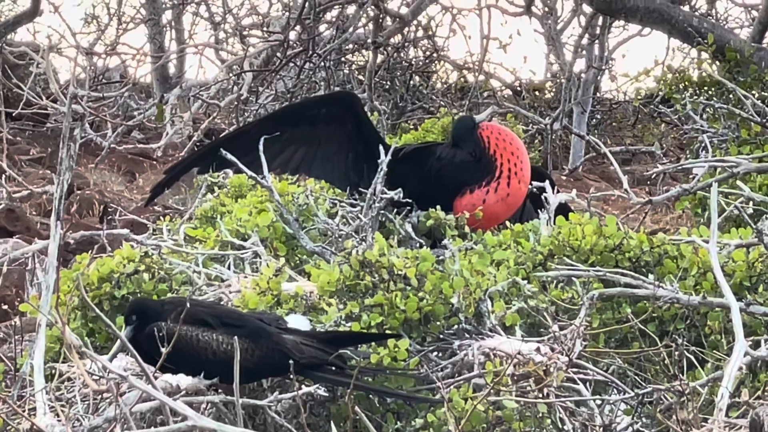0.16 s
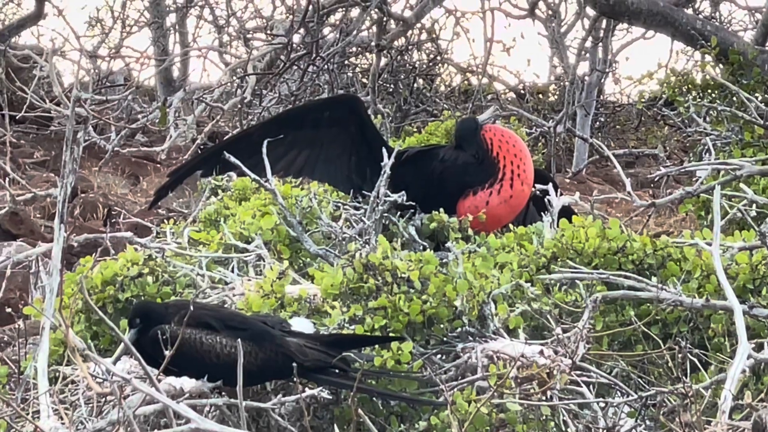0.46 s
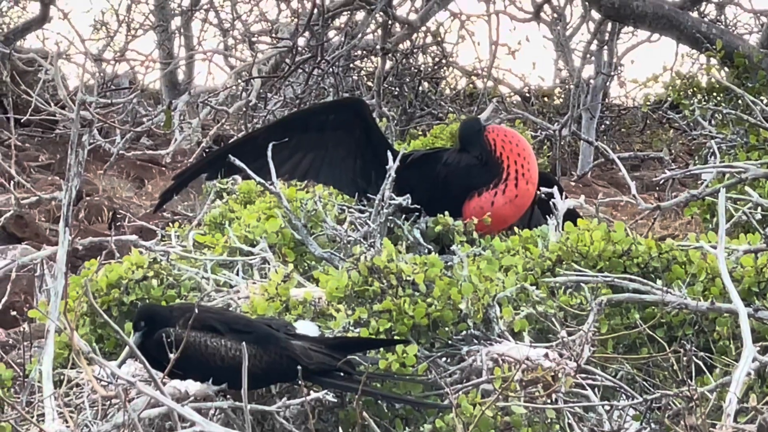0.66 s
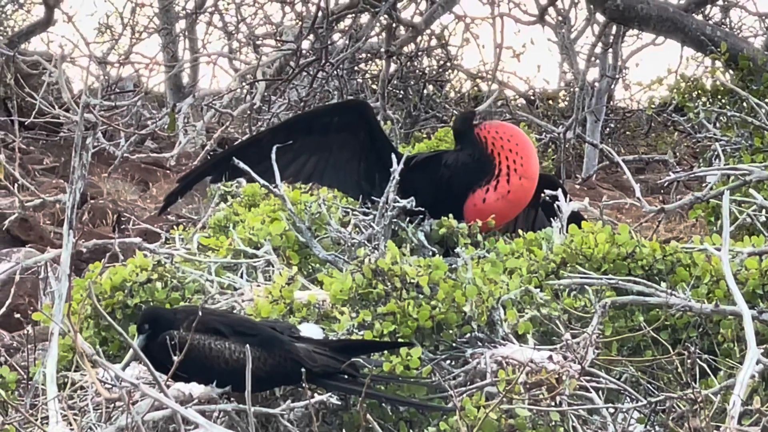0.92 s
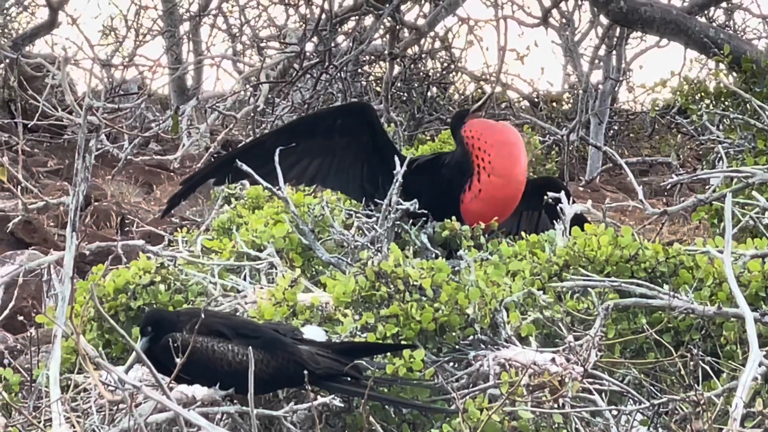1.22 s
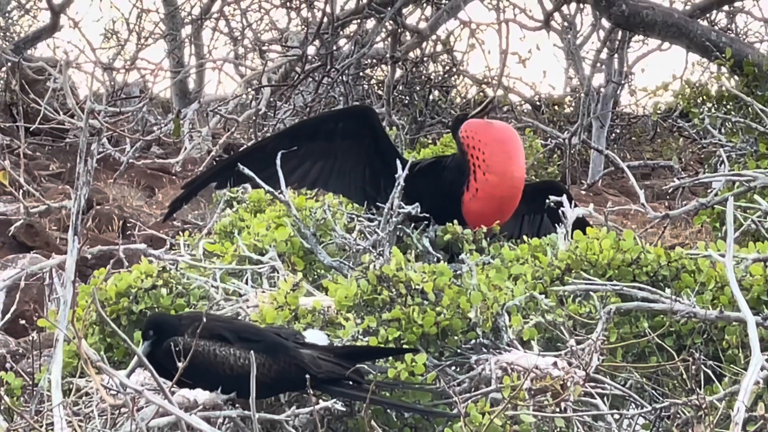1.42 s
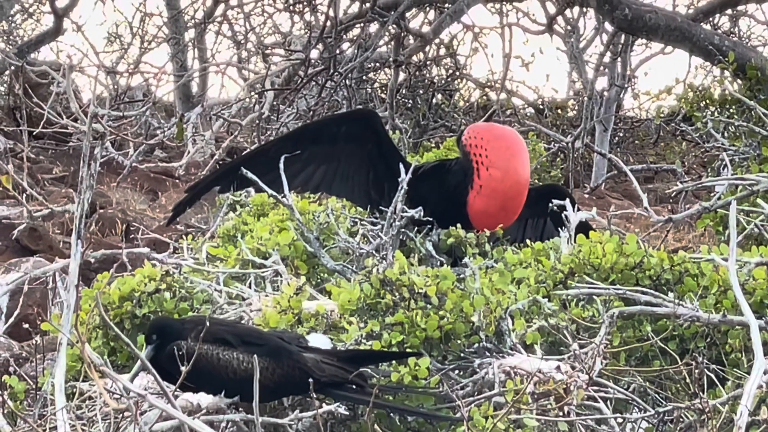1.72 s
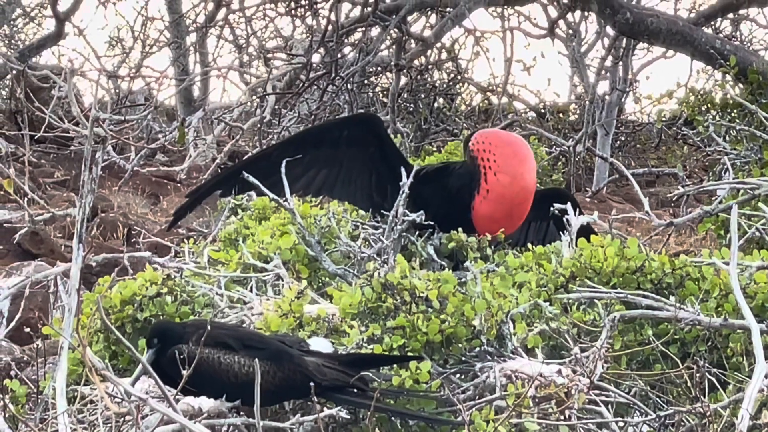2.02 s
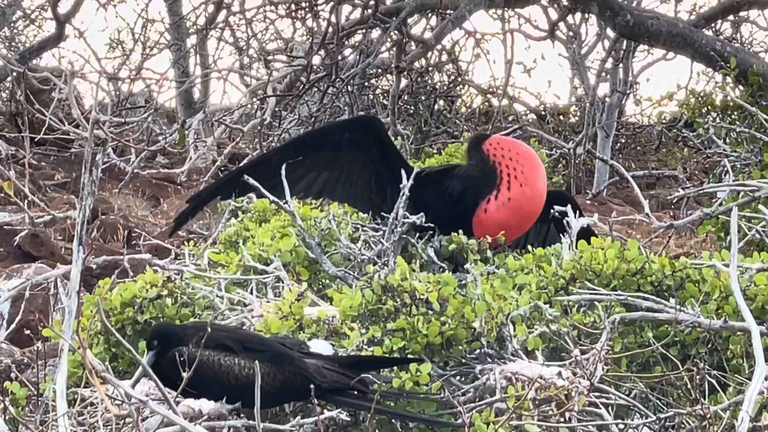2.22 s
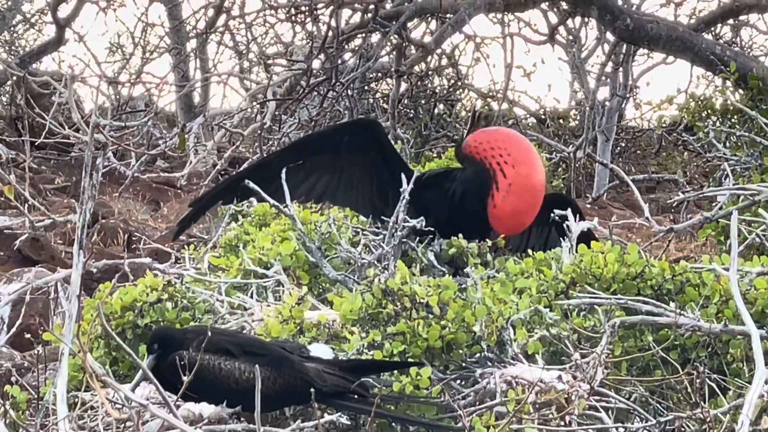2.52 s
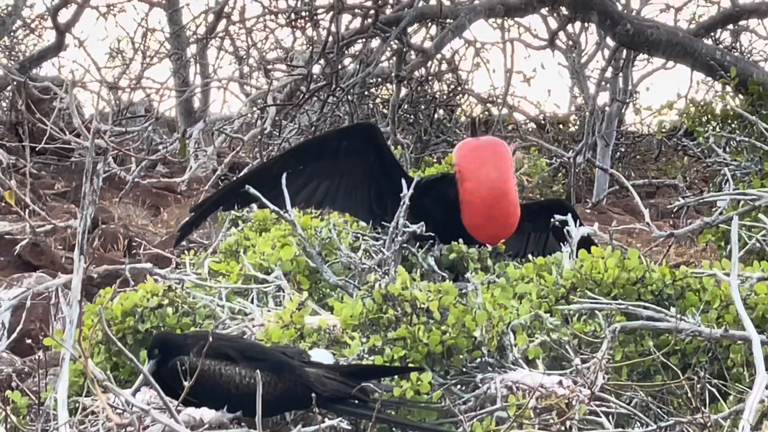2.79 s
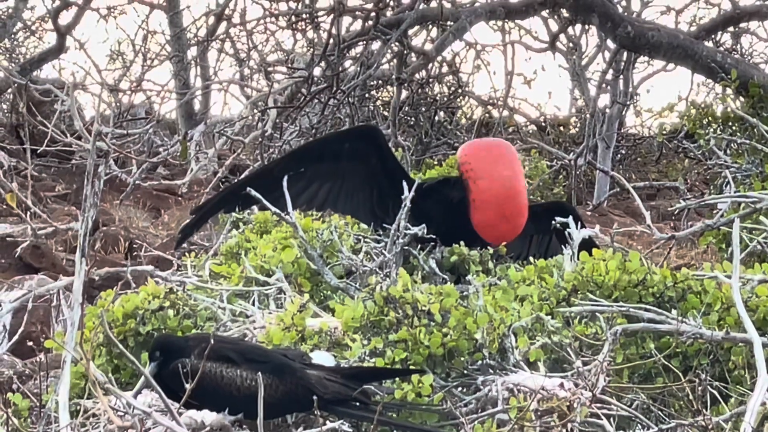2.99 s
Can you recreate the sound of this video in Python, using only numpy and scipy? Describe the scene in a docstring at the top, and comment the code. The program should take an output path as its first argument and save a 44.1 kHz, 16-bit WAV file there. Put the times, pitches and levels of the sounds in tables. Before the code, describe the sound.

A large seabird calls among dry shrubs. Small twig ticks and leaf crackle open over soft wind and a low engine-like drone. A thin, rapidly warbling whistle runs 0.55-1.4 s, then trails faintly. A soft hollow pouch knock falls at 1.6. From 2.0 to 2.8, eight sharp bill snaps rattle slowly; a second warble spans 2.6-3.15, with a last snap at 3.08 and a loud hollow knock at 3.12.

```python
"""Bill rattle and warbling whistles among shrubs

A large seabird among dry shrubs snaps its bill in a slow rattle: short bursts of damped partials.
Its inflated pouch, a set of decaying modes, is knocked once loudly and once faintly.
Whistles, loud and faint, are frequency-modulated tones; twigs and dry leaves give tiny noise bursts.
Swells of leaf hiss, a low drone and wind are noise bands of wavering level.
"""
import sys
import numpy as np
from scipy import signal
from scipy.fft import rfft, irfft
from scipy.io import wavfile

SR = 44100
rng = np.random.default_rng(int(sys.argv[2]) if len(sys.argv) > 2 else 0)


def file_out(sig):
    """Save sig as 16-bit WAV at sys.argv[1]."""
    # one column per channel
    cols = np.atleast_2d(sig).T
    # limit, then scale
    lim = np.clip(cols, -1, 1)
    pcm = np.round(lim * 32767).astype(np.int16)
    wavfile.write(sys.argv[1], SR, pcm)


N = 138915  # samples
ECHO_T60_S = 0.26  # usual decay of the longer echo tail

SNAP_RISE_S, SNAP_HOLD_S, SNAP_T60_S = 0.00129, 0.00133, 0.0018


def burst(t):
    """Pulse envelope: a sine-squared rise, a brief hold and an exponential decay."""
    rise = np.sin(np.pi / 2 * np.clip(t / SNAP_RISE_S, 0, 1)) ** 2
    return rise * fall(np.maximum(t - SNAP_RISE_S - SNAP_HOLD_S, 0), SNAP_T60_S)


# Bill snaps: t/s, level/dB, fundamental f/Hz, fundamental level/dB re the snap, main ring f/Hz
BILL_SNAPS = [(2.0209, -38, 2370, -9, 4790), (2.143, -46.5, 2490, 0, 4650), (2.2542, -51, 2420, 0.5, 4560),
              (2.3481, -44.5, 2510, -6.5, 4740), (2.463, -38, 2520, -10, 4780),
              (2.5701, -36.5, 2390, -13, 4790), (2.6835, -35.5, 2490, -10, 4855),
              (2.816, -32.5, 2460, -14.5, 4815), (3.0821, -39.5, 2380, -6.5, 4630)]
# Partials of the bill: frequency ratio to the main ring, level/dB
BILL_PARTIALS = [(1, -1), (1.14, -13), (1.46, -17), (1.35, -26), (1.62, -21.5), (.85, -25), (1.93, -30),
                 (2.55, -33)]
PITCH_SAG, SAG_TIME_S = 0.025, 0.0032  # share by which pitch sinks, and the time that takes
FUNDAMENTAL_DELAY_S = 0.00096
VARY_DB, VARY_PITCH = 8.5, 0.037  # full range of the side partials: dB, share of frequency
CRACK_DB, CRACK_RISE_S, CRACK_T60_S = -10, 0.00059, 0.009
CRACK_BAND_HZ = [2000, 6760]
SNAP_ECHO_DB = -11.5


def snaps():
    """Impact excitation: each snap is a noise crack and a short burst of the bill's partials."""
    out, t = np.zeros((2, N)), np.arange(600) / SR
    turns = rng.random((len(BILL_SNAPS), len(BILL_PARTIALS), 3))
    crack_filter = signal.butter(2, CRACK_BAND_HZ, "band", fs=SR, output="sos")
    cracks = signal.sosfilt(crack_filter, rng.standard_normal((len(BILL_SNAPS), 600)))
    phase = 2 * np.pi * (t - PITCH_SAG * t ** 2 / (2 * SAG_TIME_S))
    for (s, db, hz, low_db, ring_hz), turn, crack in zip(BILL_SNAPS, turns, cracks):
        fundamental = undb(low_db) * burst(t - FUNDAMENTAL_DELAY_S) * np.sin(hz * phase)
        ring = 0
        for (ratio, partial_db), (start, level_draw, pitch_draw) in zip(BILL_PARTIALS, turn):
            varies = ratio != 1  # the main ring stays fixed
            gain = undb(partial_db + VARY_DB * (level_draw - .5) * varies)
            partial_hz = ring_hz * ratio * (1 + VARY_PITCH * (pitch_draw - .5) * varies)
            ring = ring + gain * np.sin(partial_hz * phase + 2 * np.pi * start)
        crack_env = np.clip(t / CRACK_RISE_S, 0, 1) * fall(t, CRACK_T60_S)
        x = fundamental + burst(t) * ring + undb(CRACK_DB) * crack * crack_env
        add(out, undb(db) * x, s - .0005, 0)
    return echo(ports(out), SNAP_ECHO_DB)


# Knocks on the pouch: t/s, peak level/dB before echo
POUCH_KNOCKS = [(3.1194, -29), (1.599, -49.5)]
# Modes of the hollow pouch: f/Hz at the blow, level/dB, T60/s
POUCH_MODES = [(244, -12.5, 0.052), (374, -5.5, 0.13), (500, -0.5, 0.026), (750, 1, 0.063),
               (1044, -6.5, 0.048), (1172, -1, 0.091), (1385, -7, 0.041), (1538, -13, 0.063),
               (2250, -15.5, 0.082), (2510, -13, 0.029), (3570, 3, 0.0045), (6700, -8, 0.0063),
               (12800, -10, .004)]
POUCH_RISE, POUCH_RISE_S = 0.028, 0.013  # share by which pitch climbs after the blow, time constant
KNOCK_ECHO_DB = -13


def knocks():
    """Modal synthesis: a blow rings the hollow pouch as decaying sines of climbing pitch."""
    out, t = np.zeros((2, N)), np.arange(8000) / SR
    tense = t + POUCH_RISE * (t - POUCH_RISE_S * (1 - np.exp(-t / POUCH_RISE_S)))
    ring = 0
    for k, (hz, db, t60) in enumerate(POUCH_MODES):
        mode = undb(db) * fall(t, t60) * np.sin(2 * np.pi * hz * tense)
        ring = ring + (-1) ** k * mode  # alternating polarity
    for s, db in POUCH_KNOCKS:
        add(out, undb(db) * ring / abs(ring).max(), s, 0)
    return echo(out, KNOCK_ECHO_DB)


# Whistled calls, one row per warble: dip t/s, dip f/Hz, dip level/dB, following top f/Hz, top level/dB
FIRST_CALL = [(.55, 2000, -79, 2030, -73), (.59, 2080, -74.5, 2200, -68), (.655, 2190, -69, 2210, -66),
              (.705, 2270, -67.5, 2400, -65), (.73, 2420, -67.5, 2580, -63.5),
              (.765, 2470, -62.5, 3150, -66), (.799, 2490, -62, 3000, -64), (.841, 2550, -63.5, 2900, -62),
              (.874, 2640, -62, 2800, -62.5), (.911, 2640, -65, 3280, -73), (.945, 2620, -57, 3350, -74),
              (.98, 2600, -59.5, 3410, -72), (1.022, 2640, -62, 3650, -76), (1.054, 2620, -59.5, 3800, -80),
              (1.087, 2600, -60.5, 3900, -78), (1.121, 2680, -60, 3900, -78.5),
              (1.156, 3220, -73.5, 3480, -83), (1.191, 3250, -67.5, 3490, -75),
              (1.229, 3130, -63, 3550, -79), (1.266, 2570, -68.5, 3600, -81),
              (1.302, 2540, -62, 3650, -83.5), (1.344, 2430, -62.5, 2760, -73.5),
              (1.374, 2300, -73, 2600, -92), (1.41, 2500, -98, 2500, -93)]
SECOND_CALL = [(2.596, 1990, -98, 2050, -71.5), (2.619, 2168, -70, 2500, -69),
               (2.649, 2377, -73, 2800, -71), (2.688, 2800, -63, 3000, -82), (2.731, 2900, -105, 3000, -84),
               (2.786, 3000, -67, 3100, -65), (2.812, 3190, -83, 3200, -79), (2.84, 3060, -83, 3150, -69),
               (2.872, 2610, -63.5, 3200, -67), (2.904, 3005, -61, 3260, -73),
               (2.934, 3166, -65, 3270, -71.5), (2.968, 2603, -72.5, 3260, -71),
               (2.994, 3240, -69, 3280, -74), (3.03, 2573, -66, 3400, -80.5),
               (3.065, 2526, -63.5, 3400, -72.5), (3.1, 2520, -59, 3300, -75),
               (3.134, 2460, -59, 2900, -79), (3.16, 2570, -75, 2600, -68)]
FAINT_CALL = [(1.401, 2470, -89, 2480, -89), (1.519, 2476, -85, 3004, -87), (1.619, 2276, -82, 2450, -90),
              (1.741, 2520, -84, 2600, -83.5), (1.8, 2980, -97, 3060, -85.5), (1.881, 3040, -81, 3060, -80),
              (2.03, 3060, -87, 3100, -95)]
# Warble shape: t/s, jump (higher lingers at dip and top), skew (above 1: slow climb, quick fall),
# flatness (higher: shorter dips)
WARBLE_SHAPE = [(.78, 0.62, 2, 1.05), (.88, 0.91, 1.3, 0.93), (.98, 1.7, .85, 1.94), (1.06, 1.3, 1.0, 1.3),
                (2.7, 2, 0.98, 1.61)]


def whistle(rows):
    """Frequency modulation: a near-pure tone arches from dip to top and back once a warble."""
    r = np.array(rows, float)
    place = np.interp(time(), r[:, 0], np.arange(len(r)))
    k = np.minimum(place.astype(int), len(r) - 2)
    shape = np.array(WARBLE_SHAPE)
    jump, skew, flatness = (np.interp(time(), shape[:, 0], shape[:, c]) for c in (1, 2, 3))
    # up runs from 0 at a dip to 1 at the top
    up = np.sin(np.pi * (place - k) ** skew) ** 2
    up = 1 - (1 - up) ** flatness
    up = up ** jump / (up ** jump + (1 - up) ** jump)
    dip_hz, dip_db = (np.interp(place, np.arange(len(r)), r[:, c]) for c in (1, 2))
    hz = (dip_hz + up * (r[k, 3] - dip_hz)) * (1 + 0.0039 * walk(220))
    db = dip_db + up * (r[k, 4] - dip_db) + 1.5 * walk(54)
    sounding = (place > 0) * (place < len(r) - 1)
    return np.sqrt(2) * undb(db) * sounding * np.sin(2 * np.pi * np.cumsum(hz) / SR)


# Notes of the lower voice: t/s, f/Hz, level/dB
LOWER_VOICE = [(1.158, 2780, -66), (1.194, 2780, -73), (1.228, 2770, -68), (2.903, 2580, -75),
               (2.938, 2690, -76)]
LOW_NOTE_S = .006  # standard deviation of the Gaussian envelope


def low_notes():
    """Superposition: short Gaussian tones of the lower voice sound on where the whistle stays high."""
    t, out = time(), 0
    for s, hz, db in LOWER_VOICE:
        env = np.exp(-.5 * ((t - s) / LOW_NOTE_S) ** 2)
        out = out + np.sqrt(2) * undb(db) * env * np.sin(2 * np.pi * hz * t)
    return out


# Throat resonances: f/Hz, width/Hz, lift/dB
THROAT_PEAKS = [(2695, 700, 0.5), (3016, 270, -4.5), (3300, 150, 4), (3940, 420, -10)]
CALL_ECHO_DB, CALL_ECHO_T60_S = -5, 0.41


def calls():
    """Source and filter: whistles and low notes pass the throat's resonances, then echo."""
    voices = whistle(FIRST_CALL) + whistle(SECOND_CALL) + whistle(FAINT_CALL) + low_notes()
    voices = lift(voices, THROAT_PEAKS)
    return echo(np.tile(voices, (2, 1)), CALL_ECHO_DB, CALL_ECHO_T60_S)


TICK_T60_S = 0.0076


def tick(noise, hz, width_hz):
    """Band-limited impulse: a very short decaying noise burst of peak 1 around one frequency."""
    f = np.arange(257) * SR / 512
    x = irfft(rfft(noise) / (1 + ((f - hz) / (width_hz / 2)) ** 4))
    x = x * fall(np.arange(512) / SR, TICK_T60_S)
    return x / abs(x).max()


# Twig ticks: t/s, level/dB, f/Hz, high-part level/dB before the crest is added
TWIG_TICKS = [(0.11, -59.5, 2430, -99), (0.171, -61.5, 3900, -103), (0.1849, -57, 1800, -105),
              (0.2406, -60.5, 2570, -101), (0.3433, -65, 1970, -92), (0.376, -63, 2250, -91),
              (0.435, -53, 2800, -64.5), (0.5124, -60.5, 2610, -98), (1.5991, -52, 2050, -91),
              (1.8043, -57.5, 2142, -89), (1.9304, -54, 1900, -102), (2.0496, -54, 4450, -76),
              (2.1853, -45.5, 2200, -72), (2.212, -48, 3000, -70), (2.2936, -55, 2520, -76),
              (2.3887, -59, 2240, -79), (2.412, -65, 3500, -90), (2.529, -53, 2170, -79),
              (2.6081, -52, 3800, -61.5), (2.6352, -56, 4330, -70), (2.7246, -54.5, 3800, -75),
              (2.753, -55, 4200, -74), (2.8745, -55, 3120, -109), (2.949, -58.5, 3167, -100)]
# Dry-leaf crackle: t/s, floor level/dB
LEAF_CRACKLE = [(0, -88), (.38, -80.5), (.44, -76.5), (.5, -85.5), (.9, -87.5), (1.3, -97), (2, -90.5),
                (2.7, -84), (3.15, -105)]
TICK_WIDTH_HZ, TICK_ECHO_DB = 3200, -5.5
HIGH_HZ, HIGH_WIDTH_HZ, HIGH_CREST_DB = 14200, 8300, 9.5
CRACKLE_PER_S, CRACKLE_SPREAD_DB = 290, 4  # mean excess above the floor


def ticks():
    """Random impulses: twigs tick, each in its own colour, over a crackle of dry leaves."""
    out = np.zeros((2, N))
    for (s, db, hz, high_db), noise in zip(TWIG_TICKS, rng.standard_normal((len(TWIG_TICKS), 512))):
        body = undb(db) * tick(noise, hz, TICK_WIDTH_HZ)
        high = undb(high_db + HIGH_CREST_DB) * tick(noise, HIGH_HZ, HIGH_WIDTH_HZ)
        add(out, body + high, s - .0005, 0)
    for when, loud, colour, side in rng.random((int(CRACKLE_PER_S * N / SR), 4)):
        s = when * N / SR
        db = np.interp(s, *np.array(LEAF_CRACKLE).T) - CRACKLE_SPREAD_DB * np.log(1 - loud)
        x = tick(rng.standard_normal(512), 3000 + 4600 * colour ** 2, 1200)
        add(out, undb(db) * x, s, 8 * (side - .5))
    return echo(out, TICK_ECHO_DB)


# Swells of leaf hiss: t/s, standard deviation/s, level/dB
LEAF_SWELLS = [(.39, 0.061, -98), (.44, 0.024, -87), (1.44, 0.058, -100), (2.2, 0.048, -92),
               (2.38, 0.019, -93), (2.62, 0.022, -99), (2.74, 0.027, -90), (3.135, 0.018, -85)]
RUSTLE_HZ, RUSTLE_WIDTH_HZ = 13200, 1600  # centre, standard deviation


def rustle():
    """Amplitude-modulated noise: short flickering swells of high leaf hiss."""
    env = sum(undb(db) * np.exp(-.5 * ((time() - s) / w) ** 2) for s, w, db in LEAF_SWELLS)
    hiss = shaped(lambda f: np.exp(-.5 * ((f - RUSTLE_HZ) / RUSTLE_WIDTH_HZ) ** 2))
    return env * undb(3.0 * walk(80)) * hiss


# Low drone bands: f/Hz, width/Hz, level/dB
DRONE_BANDS = [(63.8, 15.6, -51.5), (91.7, 8, -60.5), (128.3, 27.3, -59), (159.6, 14, -68.5),
               (47, 16, -72.5)]


def drone():
    """Narrow-band noise: low bands that waver, like a far engine."""
    out = 0
    for hz, w, db in DRONE_BANDS:
        noise = band(hz, lambda f: 1 / (1 + ((f - hz) / (w / 2)) ** 4))
        out = out + undb(db + 1.0 * walk(2.1)) * noise
    return out


# Wind spectrum: f/Hz, relative spectral density level/dB
WIND_SPECTRUM = [(25, -30.5), (35, -19.5), (45, -16.5), (65, -13.5), (100, -16), (140, -16), (200, -20),
                 (260, -23.5), (350, -28.5), (575, -31), (850, -36), (1330, -35), (1750, -44.5),
                 (2500, -41.5), (3300, -55.5), (4200, -58), (5500, -62.5), (7500, -67.5), (9000, -87),
                 (11000, -67.5), (13500, -69), (14800, -76), (16000, -86)]
# Gust above GUST_HZ: t/s, level/dB
GUST_LEVEL = [(0, -2.5), (1, -0.5), (2.5, 0)]
WIND_DB, GUST_HZ = -53.5, 200


def wind():
    """Filtered turbulence noise: quarter-octave bands that swell together and flicker alone."""
    out, swell = 0, walk(0.83)
    gust_db = np.interp(time(), *np.array(GUST_LEVEL).T)
    for hz in 25 * 2 ** (np.arange(38) / 4):
        db = table(WIND_SPECTRUM, hz) + 10 * np.log10(hz / 100)  # bandwidth grows with frequency
        db = db + 0.5 * swell + gust_db * (hz > GUST_HZ) + 1.0 * walk(21)
        noise = band(hz, lambda f: np.cos(np.pi / 2 * np.clip(4 * np.log2(f / hz), -1, 1)))
        out = out + undb(db) * noise
    return undb(WIND_DB) * out


# Stereo width: f/Hz, side minus mid level/dB
STEREO_WIDTH = [(60, -22), (110, -14.5), (200, -8.5), (380, -7), (700, 5), (1290, -4.5), (2380, -21),
                (4400, -16), (7000, -0.5), (9000, 17.5), (11000, 4), (13000, -13.5), (15000, -7.5)]
# Stereo lean: f/Hz, left minus right level/dB
STEREO_LEAN = [(60, 2), (110, 0.5), (200, 2.5), (380, -1), (700, -2.5), (1290, -2.0), (2380, 0.5),
               (4400, -0.5), (8120, 0.5), (15000, 0.5)]


def band(hz, shape):
    """Partial coherence: mid and side noise mixed to the width and lean of the frequency."""
    side = undb(table(STEREO_WIDTH, hz)) * shaped(shape)
    pair = shaped(shape) + side * np.array([[1], [-1]])
    return pair * undb(table(STEREO_LEAN, hz) / 2 * np.array([[1], [-1]]))


# Phase between microphone ports: f/Hz, lead of left over right/rad
PORT_LEAD = [(0, 0), (1300, 0.11), (5000, 0.75), (7000, 1), (8300, 4), (9700, 4), (11000, 7), (16000, 6.5)]


def ports(x):
    """Interchannel phase: two microphone ports hear a near source with a frequency-dependent lead."""
    p = np.array(PORT_LEAD, float)
    lead = np.interp(np.arange(N // 2 + 1) * SR / N, p[:, 0], p[:, 1]) / 2
    return irfft(rfft(x) * np.exp(1j * lead * np.array([[1], [-1]])), N)


SHRUB_T60_S, SHRUB_DB = 0.038, 6
ECHO_BUILD_S, ECHO_GRAIN_DB = 0.0034, 2.5


def echo(x, db, t60=ECHO_T60_S):
    """Diffuse scattering: grainy echo from shrubs close by and a longer tail from the slope."""
    t = np.arange(SR // 2) / SR
    decay = fall(t, t60) + undb(SHRUB_DB) * fall(t, SHRUB_T60_S)
    tail = rng.standard_normal((2, len(t))) * decay
    tail = tail * (1 - np.exp(-t / ECHO_BUILD_S)) * undb(ECHO_GRAIN_DB * walk(210)[:len(t)])
    tail = tail[0] + .4 * tail[1] * np.array([[1], [-1]])
    tail = tail / np.sqrt(np.sum(tail[0] ** 2))  # unit energy on the left
    return x + undb(db) * signal.fftconvolve(x, tail, axes=1)[:, :N]


def lift(x, peaks):
    """Resonance equalisation: raise or lower narrow Gaussian regions of the spectrum."""
    f = np.arange(N // 2 + 1) * SR / N
    gain_db = sum(db * np.exp(-2 * ((f - hz) / w) ** 2) for hz, w, db in peaks)
    return irfft(rfft(x) * undb(gain_db), N)


def undb(db):
    """Decibel law: level to amplitude ratio."""
    return 10 ** (np.asarray(db) / 20)


def time():
    """Uniform sampling: the time of each sample in s."""
    return np.arange(N) / SR


def table(points, hz):
    """Logarithmic frequency scale: read (f/Hz, value) points on it."""
    p = np.array(points, float)
    return np.interp(np.log(hz), np.log(p[:, 0]), p[:, 1])


def shaped(gain):
    """Spectral shaping: noise of standard deviation 1 with a gain given as a function of Hz."""
    x = irfft(rfft(rng.standard_normal(N)) * gain(np.arange(N // 2 + 1) * SR / N + 1e-3), N)
    return x / x.std()


def walk(rate):
    """Low-pass noise: a random wander of standard deviation 1, with its corner at rate in Hz."""
    return shaped(lambda f: 1 / (1 + (f / rate) ** 2))


def add(out, x, s, pan_db):
    """Level panning: mix x in at s seconds, left above right by pan_db."""
    i = int(s * SR)
    n = min(len(x), N - i)
    out[:, i:i + n] += x[:n] * undb(np.array([[pan_db], [-pan_db]]) / 2)


def fall(t, t60):
    """Exponential decay: down 60 dB after t60 seconds."""
    return np.exp(-np.log(1000) * t / t60)


def scene():
    """Superposition of all sources."""
    near = ports(knocks() + ticks() + rustle())
    return snaps() + near + calls() + drone() + wind()


def record(dry):
    """Low-pass filtering: an elliptic filter cuts the top above 15.8 kHz."""
    return signal.sosfilt(signal.ellip(8, .2, 70, 15800, fs=SR, output="sos"), dry)


dry = scene()
out = record(dry)
file_out(out)
```